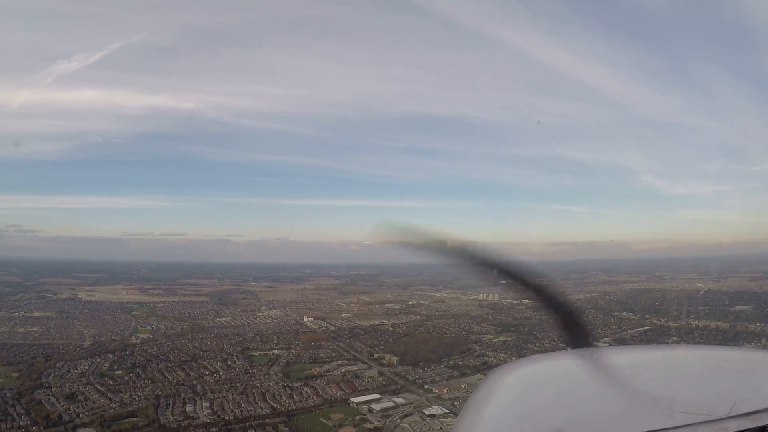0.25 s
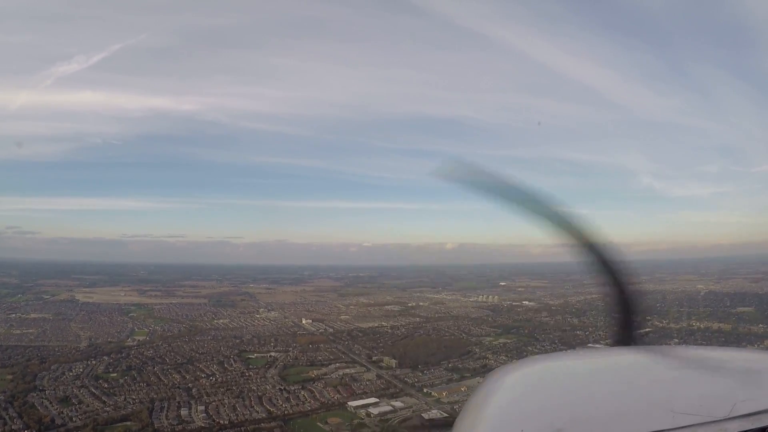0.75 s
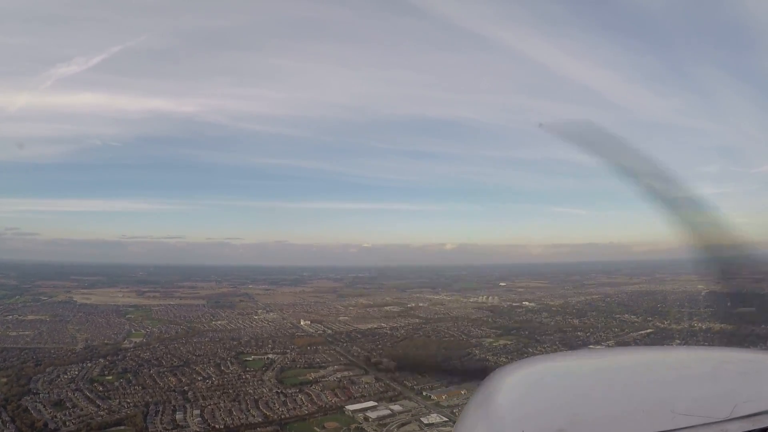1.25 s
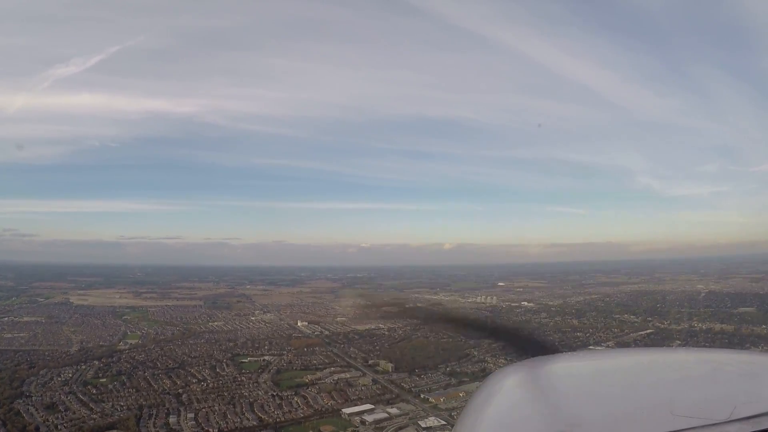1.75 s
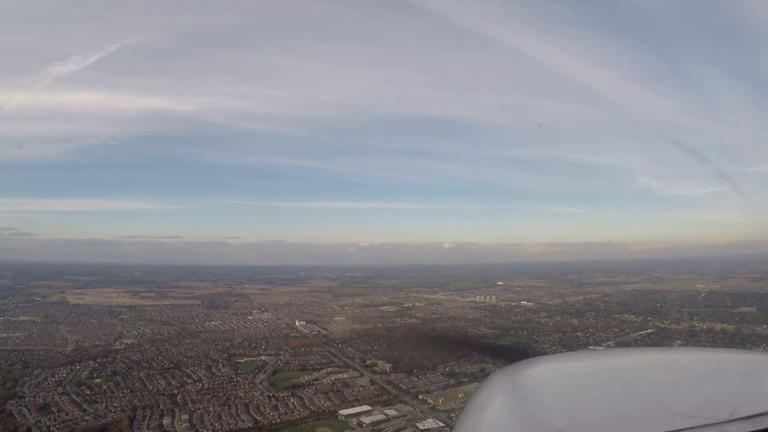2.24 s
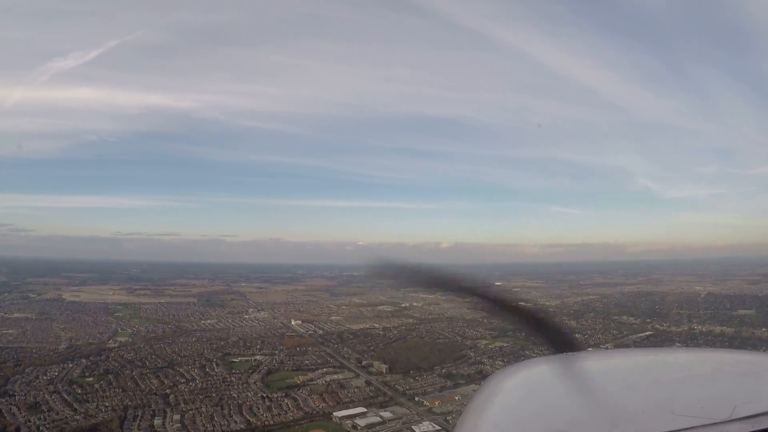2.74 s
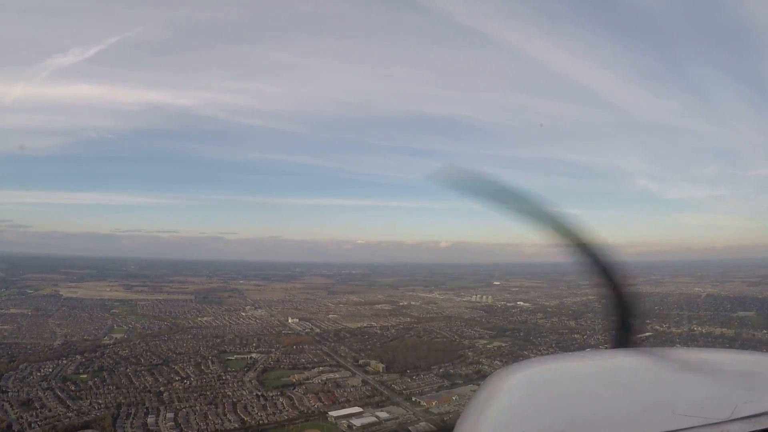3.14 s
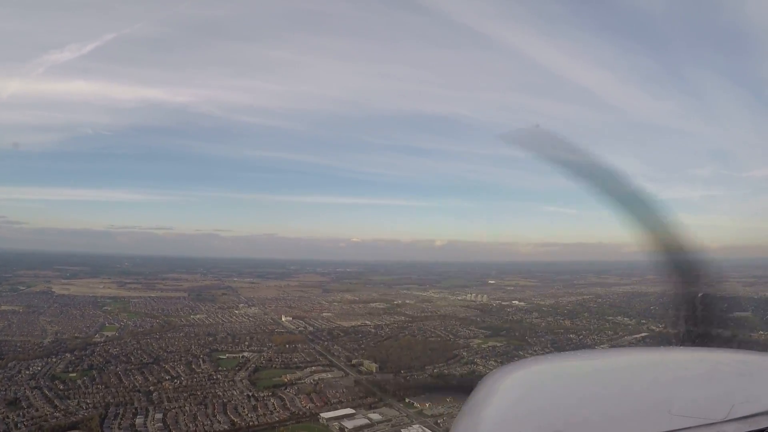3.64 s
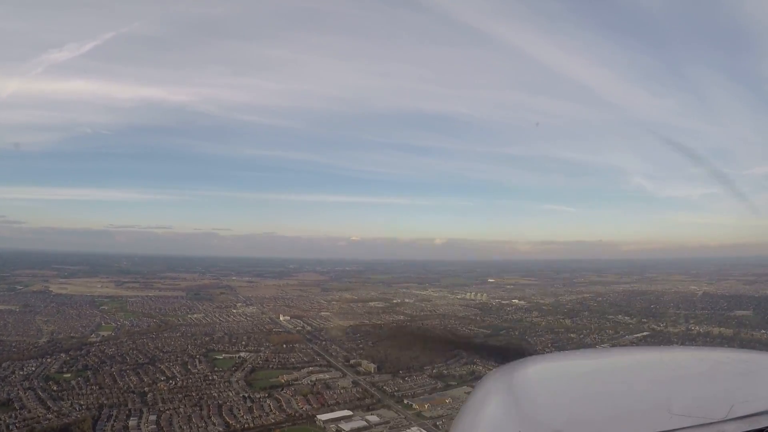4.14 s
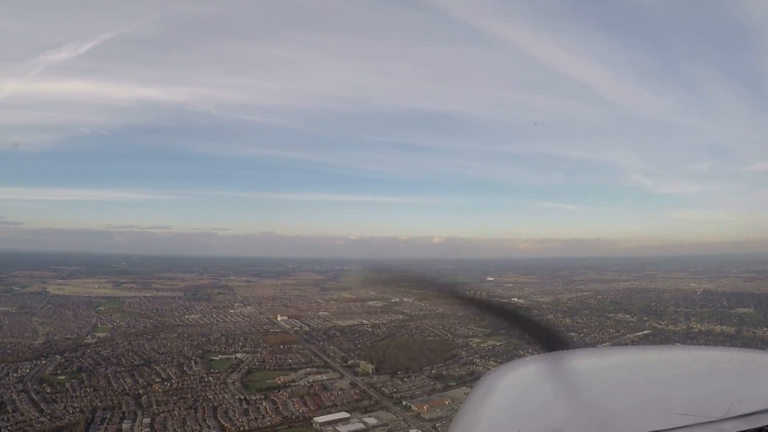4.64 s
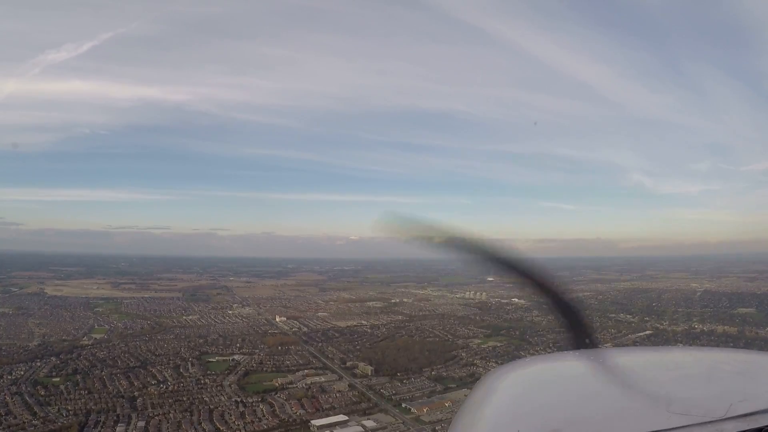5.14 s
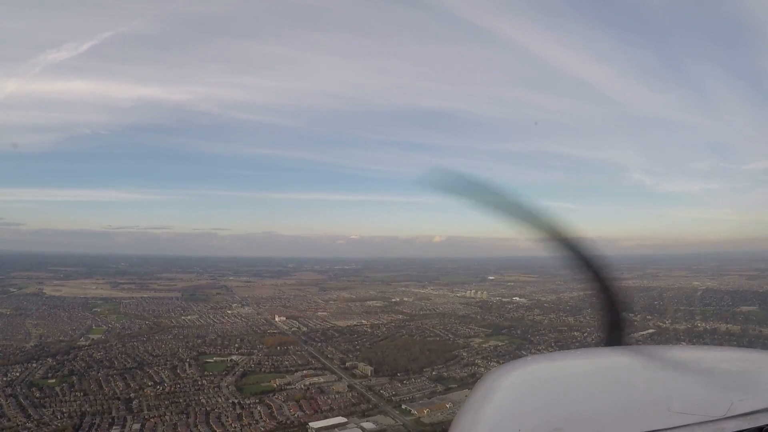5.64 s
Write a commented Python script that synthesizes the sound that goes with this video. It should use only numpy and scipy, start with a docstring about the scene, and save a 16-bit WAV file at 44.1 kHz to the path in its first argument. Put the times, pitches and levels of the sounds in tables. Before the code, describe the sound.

Inside a small aeroplane's cabin in cruise, a piston engine and two-bladed propeller drone loudly at a steady low pitch. An uneven rasping buzz rides on top, with panel rumble and a boomy cabin resonance below. Wind rushes and hisses softly over the windscreen. Tiny dry ticks of something loose come irregularly. The microphone sits in the cabin, close and loud, and nothing starts or stops.

```python
"""A steady engine and propeller drone at about 39 turns a second fills a light aeroplane's cabin in cruise.
Sines at whole and half crankshaft orders make the drone; filtered firing pulses add an uneven rasp.
Coloured noise makes panel rumble, cabin boom and the slipstream's rush and hiss over the windscreen.
Short ringing modes tick as something loose is shaken; a limiter holds the peaks down."""
import sys
import numpy as np
from scipy import signal
from scipy.fft import rfft, irfft, next_fast_len
from scipy.io import wavfile
from scipy.ndimage import uniform_filter1d, minimum_filter1d, map_coordinates

SR = 44100
rng = np.random.default_rng(int(sys.argv[2]) if len(sys.argv) > 2 else 0)


def unload_audio(sound):
    """Save the sound as a 16-bit wav file, at the path given as the first command line argument."""
    columns = np.transpose(np.atleast_2d(sound))
    # keep every value between -1 and 1, then stretch to whole-number steps
    steps = np.round(np.clip(columns, -1, 1) * 32767)
    wavfile.write(sys.argv[1], SR, steps.astype(np.int16))


N = 259749


def amp(db):
    """Decibels to gain."""
    return 10 ** (np.asarray(db) / 20)


def unit(x):
    """x at rms 1."""
    return x / np.sqrt(np.mean(x ** 2) + 1e-20)


def steady(x, span_s):
    """x divided by its running rms over span_s."""
    power = np.abs(uniform_filter1d(x ** 2, max(int(span_s * SR), 2)))
    return x / np.sqrt(power + 1e-9)


def curve(rows):
    """Rows of (seconds, value) joined by straight lines, one value per sample."""
    at_s, value = np.transpose(rows)
    return np.interp(np.arange(N) / SR, at_s, value)


def swell(level_db):
    """A level curve as dB about its own mean."""
    return level_db - level_db.mean()


def wobble(knots_per_s):
    """A smooth random curve through normally distributed knots."""
    knots = rng.standard_normal(int(N * knots_per_s / SR) + 4)
    return map_coordinates(knots, [np.arange(N) * knots_per_s / SR])


def flutter(depth_db, knots_per_s):
    """A quick random unsteadiness of level, in dB."""
    return depth_db * wobble(knots_per_s)


def filtered(x, response):
    """x times a response of frequency, zero-padded against wrap-around."""
    size = next_fast_len(N + SR // 2)
    hz = np.fft.rfftfreq(size, 1 / SR)
    return irfft(rfft(x, size) * response(hz), size)[:N]


def coloured(x, spectrum):
    """x through (Hz, dB) points joined on a log axis, with extra roll-off set by the last."""
    point_hz, point_db = np.transpose(spectrum)

    def response(hz):
        gain = amp(np.interp(np.log(hz + 1), np.log(point_hz), point_db))
        return gain / np.hypot(1, (hz / point_hz[-1]) ** 2)

    return filtered(x, response)


def noise(spectrum, gate=1):
    """Gated, then coloured noise of rms 1."""
    return unit(coloured(gate * rng.standard_normal(N), spectrum))


def ticks(trim_db, attack_s):
    """Tiny dry contacts; each rings the loose part at new strengths for a few milliseconds."""
    # Each row: start in seconds, level in dB before the trim, brightness in dB.
    contacts = [(0.1881, -20.5, 0), (0.2778, -19.5, 1), (1.1063, -17.5, 0), (1.4496, -20.5, -2),
                (2.8668, -20.5, -3), (2.9827, -13.5, 1), (3.9522, -20, -4), (4.0415, -13, 0),
                (4.5143, -20.5, -4), (4.578, -20.5, -1)]
    # Modes of the loose part. Each row: frequency in Hz, nominal level in dB, t60 in seconds.
    modes = [(900, 1, .006), (1950, 0, .006), (2750, -1.5, .005), (3700, -6, .004), (6250, -2.5, .005),
             (7750, -11.5, .006), (8650, -19, .007)]
    faint_per_s, faint_db, faint_spread_db = 2.5, -23.5, 1  # level before the trim
    treble_hz, mode_spread_db = 5000, 2.3  # brightness acts on modes above treble_hz
    faint = [(rng.uniform(0, N / SR), rng.normal(faint_db, faint_spread_db), 0)
             for _ in range(round(faint_per_s * N / SR))]
    t = np.arange(SR // 100) / SR
    onset = 1 - np.exp(-t / attack_s)
    out = np.zeros(N + SR)
    for start_s, db, bright_db in contacts + faint:
        ring = np.zeros(len(t))
        for k, (hz, mode_db, t60_s) in enumerate(modes):
            level_db = mode_db + bright_db * (hz > treble_hz) + rng.normal(0, mode_spread_db)
            sign = (-1) ** k
            ring += sign * amp(level_db - 60 * t / t60_s) * np.sin(2 * np.pi * hz * t)
        out[round(start_s * SR):][:len(t)] += amp(db + trim_db) * ring * onset
    lowpass = signal.butter(8, 9200, fs=SR, output="sos")
    return signal.sosfilt(lowpass, out[:N])


def rumble(trim_db):
    """Low rumble of the panels: steadied noise, weighted below 160 Hz, on a fluttering level."""
    # Each row: frequency in Hz, relative density in dB per Hz.
    spectrum = [(10, -26.5), (20, -22), (30, -4.5), (40, 10), (65, 9), (95, 10.5), (120, 8), (160, -16.5),
                (260, -50.5)]
    # Each row: time in seconds, level in dB before trim and flutter.
    level_rows = [(0.0, -18), (1.2, -21), (1.4, -15), (2.1, -18.5), (2.6, -20), (3.1, -16.5), (3.4, -22),
                  (3.7, -17), (4.3, -19.5), (4.6, -23), (5.0, -18), (5.89, -22.5)]
    level_db = curve(level_rows) + trim_db + flutter(depth_db=1.5, knots_per_s=8)
    return amp(level_db) * steady(noise(spectrum), span_s=0.24)


def boom(boom_db, trim_db):
    """Boom of the cabin air: steadied noise, strongest at 150-330 Hz."""
    # Each row: frequency in Hz, relative density in dB per Hz.
    spectrum = [(90, -26.5), (125, -10), (155, -2), (200, -0.5), (255, 0.5), (300, -1), (330, -6),
                (365, -10), (410, -12.5), (450, -29.5), (800, -81)]
    return amp(boom_db + trim_db) * steady(noise(spectrum), span_s=.12)


def driven(air_db, mean_db, growth):
    """Gain tied to the slipstream: growth is dB gained per dB of slipstream swell."""
    return amp(mean_db + growth * swell(air_db))


def wash(turns, depth):
    """The slipstream strikes harder behind each of the two blades."""
    return 1 + depth * np.cos(2 * np.pi * 2 * turns)


def hiss(turns, air_db):
    """Treble hiss of the airflow: blade-gated noise with a rapid flutter."""
    # Each row: frequency in Hz, relative density in dB per Hz.
    spectrum = [(1800, -20.5), (2800, -7), (3450, -2.5), (3650, -5.5), (4000, -1), (4700, 0.5),
                (5600, -4.5), (6800, -6.5), (7500, -13.5), (8200, -15), (8900, -14.5), (10000, -25.5),
                (11500, -33.5), (13000, -50.5)]
    gain = driven(air_db, mean_db=-34.5, growth=0.78) * amp(flutter(depth_db=0.45, knots_per_s=25))
    return gain * noise(spectrum, wash(turns, depth=.05))


def gusts():
    """Each gust rises and falls in one smooth arch, in dB."""
    # Each row: crest in seconds, length in seconds, rise in dB.
    arches = [(0.75, .25, 1.2), (3.13, 0.32, 3), (4.0, 0.44, 0.8), (5.6, 0.14, 1.5)]
    t = np.arange(N) / SR
    return sum(rise_db * np.cos(np.pi * np.clip((t - crest_s) / length_s, -.5, .5))
               for crest_s, length_s, rise_db in arches)


def screen_wind(turns, air_db):
    """Wind on the windscreen: blade-gated mid-band noise, lifted by gusts."""
    # Each row: frequency in Hz, relative density in dB per Hz.
    spectrum = [(600, -18), (950, 1.5), (1150, 2), (1400, -2), (1650, -1.5), (1920, 0.5), (2150, -6),
                (2500, -8), (3000, -17.5), (4500, -51), (10000, -88.5)]
    gain = driven(air_db, mean_db=-30.0, growth=0.92) * amp(gusts())
    return gain * noise(spectrum, wash(turns, depth=0.066))


def rush(turns, air_db):
    """Broad rush of the slipstream: blade-gated noise, strongest at 380-900 Hz."""
    # Each row: frequency in Hz, relative density in dB per Hz.
    spectrum = [(250, -27), (380, 0.5), (450, 0), (530, 2), (700, 1), (900, -2.5), (1100, -8), (1400, -19),
                (2500, -61)]
    return driven(air_db, mean_db=-24.5, growth=0.98) * noise(spectrum, wash(turns, depth=0.083))


def firings(turns, uneven_db, scatter_db, jitter_s):
    """Two exhaust pulses a turn; each of the four cylinders has its own strength."""
    index = np.arange(int(2 * turns[-1]))
    chance = rng.standard_normal((len(index), 2))
    at = np.interp(index / 2, turns, np.arange(N)) + jitter_s * SR * chance[:, 0]
    cylinder = np.array([1, -1, .5, -.5])[index % 4]
    strength = amp(uneven_db * cylinder + scatter_db * chance[:, 1])
    return np.bincount(np.clip(at, 0, N - 1).astype(int), strength, N)


def cabin(x, t60_s):
    """Dense reflections between the close panels and windows, as decaying noise."""
    t = np.arange(SR // 10) / SR
    reflections = unit(rng.standard_normal(len(t)) * amp(-60 * t / t60_s))
    return signal.fftconvolve(x, reflections)[:N]


def rasp(turns, air_db):
    """Uneven buzz of the firings through the cabin walls, rising and falling with the slipstream."""
    # Each row: frequency in Hz, relative gain in dB.
    spectrum = [(400, -30), (600, -8), (800, 0), (950, -2), (1200, -10), (1600, -14), (2000, -14),
                (3000, -30), (6000, -60)]
    pulses = firings(turns, uneven_db=14, scatter_db=2.5, jitter_s=.00007)
    buzz = unit(coloured(cabin(pulses, t60_s=0.12), spectrum))
    return driven(air_db, mean_db=-33.5, growth=1.1) * buzz


def engine_tones(turns, drone_db, boom_db, air_db, boom_follow, air_follow, waver, twist_turns):
    """Lines at whole and half crankshaft orders; uneven combustion makes each waver in level and phase."""
    # Lesser exhaust and propeller tones.
    # Each row: multiple of crankshaft speed, rms level in dB before surge and waver.
    orders = [(2.0, -27), (2.5, -32), (3.5, -34), (4.5, -23), (5.0, -31), (5.5, -29), (6.0, -20.5),
              (6.5, -29), (7.0, -30), (7.5, -32), (8.0, -19.5), (9.0, -34), (9.5, -40), (10.0, -28),
              (10.5, -32), (11.0, -37), (12.0, -35), (13.5, -42), (14.0, -33), (15.0, -36), (15.5, -41),
              (16.0, -39), (16.5, -40), (17.5, -46), (18.0, -29.5), (18.5, -40), (19.5, -43), (20.0, -46),
              (21.0, -46), (22.0, -45), (22.5, -43), (24.0, -45), (26.0, -50), (31.0, -49), (32.0, -51),
              (36.0, -54), (39.0, -53)]
    drone_order = 4  # twice the firing rate
    boom_top_order = 8  # tones up to here swell with the boom, higher ones with the slipstream
    shaft = turns + twist_turns * wobble(25)  # uneven running blurs the high orders most

    def tone(order):
        return np.sqrt(2) * np.sin(2 * np.pi * (order * shaft + rng.random()))

    boom_surge = amp(boom_follow * swell(boom_db))
    air_surge = amp(air_follow * swell(air_db))
    out = amp(drone_db) * tone(drone_order)
    for order, db in orders:
        if order < drone_order:
            surge = 1
        elif order <= boom_top_order:
            surge = boom_surge
        else:
            surge = air_surge
        out += amp(db) * surge * (1 + waver * wobble(5)) * tone(order)
    return out


def scene():
    """Engine, airframe and slipstream on one crankshaft, with loose ticks at their own times."""
    # Main drone tone. Each row: time in seconds, level in dB before trim and flutter.
    drone_rows = [(0.0, -11), (1.1, -8.5), (1.3, -10.5), (1.8, -9.2), (2.1, -12.5), (2.3, -9), (2.9, -8),
                  (3.0, -11), (3.6, -7), (3.8, -13.5), (4.2, -7.5), (4.3, -8), (4.8, -8), (5.3, -11),
                  (5.4, -8.0), (5.89, -7.5)]
    # Cabin boom. Each row: time in seconds, level in dB before the trim.
    boom_rows = [(0.0, -10), (0.2, -10.5), (0.5, -12), (1.3, -10), (1.7, -11.5), (1.9, -9), (2.3, -13),
                 (2.5, -8.5), (2.8, -13.5), (3.1, -13), (3.3, -11), (3.6, -13.0), (3.9, -14), (4.4, -7.5),
                 (4.8, -11.5), (4.9, -10.5), (5.89, -11.5)]
    # Slipstream. Each row: time in seconds, strength in dB; only its swell about the mean counts.
    air_rows = [(0.0, -16.5), (0.2, -16.5), (0.7, -15), (1.2, -15.5), (1.3, -17.5), (1.7, -16),
                (2.0, -18.0), (2.3, -16.0), (2.6, -17.5), (3.1, -18), (3.6, -18.5), (3.8, -16.5),
                (4.2, -16), (4.4, -17.5), (4.7, -17.5), (5.0, -18.5), (5.3, -17), (5.89, -18.5)]
    crank_hz, sag_hz_per_s = 39.22, 0.014  # starting speed and its slow fall
    turns = np.cumsum(crank_hz - sag_hz_per_s * np.arange(N) / SR) / SR
    drone_db = curve(drone_rows) - 2.47 + flutter(depth_db=.5, knots_per_s=10)
    boom_db = curve(boom_rows)
    air_db = curve(air_rows) + flutter(depth_db=0.26, knots_per_s=14)
    airframe = ticks(trim_db=1, attack_s=.00005) + rumble(trim_db=-4.5) + boom(boom_db, trim_db=-4.0)
    slipstream = hiss(turns, air_db) + screen_wind(turns, air_db) + rush(turns, air_db)
    tones = engine_tones(turns, drone_db, boom_db, air_db,
                         boom_follow=1.1, air_follow=1.15, waver=0.19, twist_turns=0.0017)
    engine = rasp(turns, air_db) + tones
    return (airframe + slipstream + engine)[None]


def limiter(x, ceiling, hold_s):
    """The gain ducks smoothly, with a soft knee, round every peak that nears the ceiling."""
    size = max(int(hold_s * SR), 2)
    needed = (1 + (np.abs(x) / ceiling) ** 10) ** (-1 / 10)
    return x * uniform_filter1d(minimum_filter1d(needed, size), size)


def record(dry):
    """Limit the peaks, then cut everything from the band limit up."""
    top_hz = 13500
    held = limiter(dry[0], ceiling=.96, hold_s=.012)
    return filtered(held, lambda hz: hz < top_hz)[None]


dry = scene()
out = record(dry)
unload_audio(out)
```